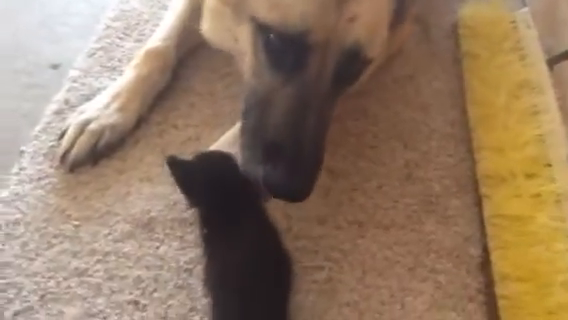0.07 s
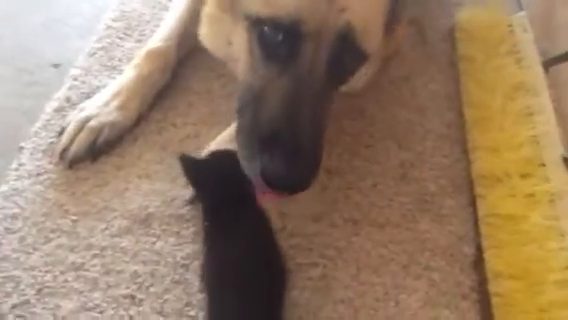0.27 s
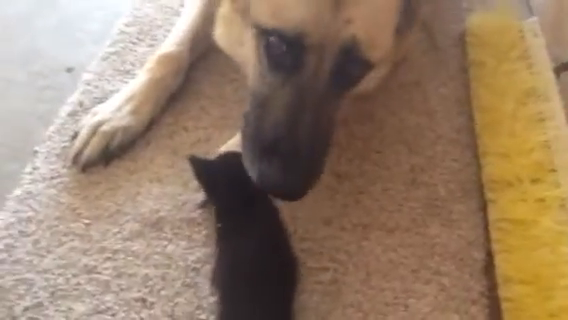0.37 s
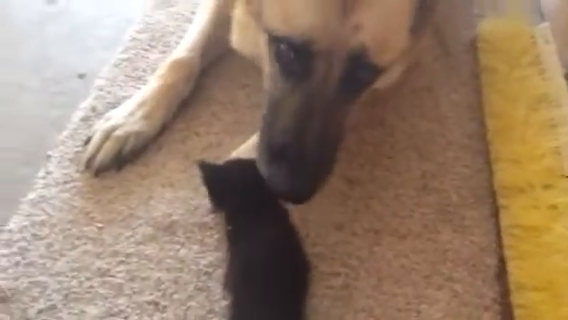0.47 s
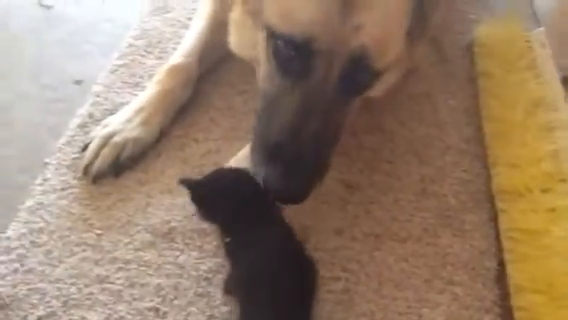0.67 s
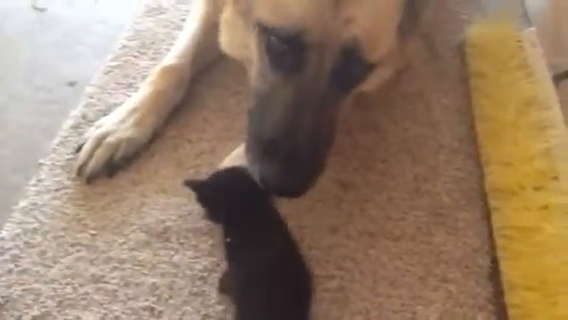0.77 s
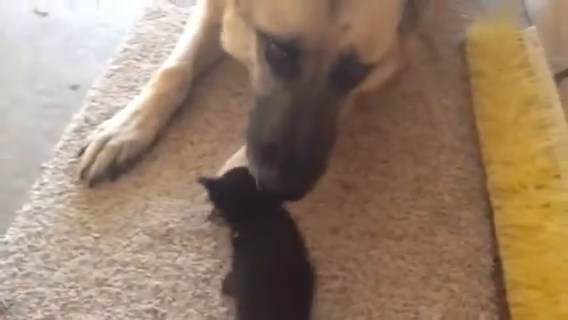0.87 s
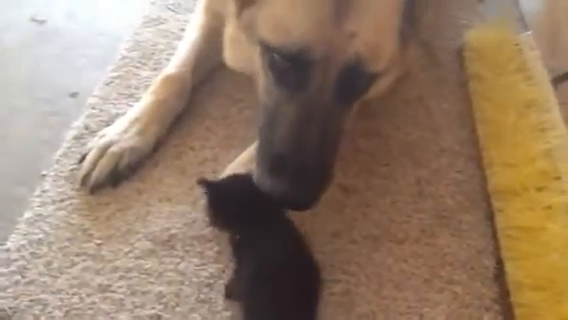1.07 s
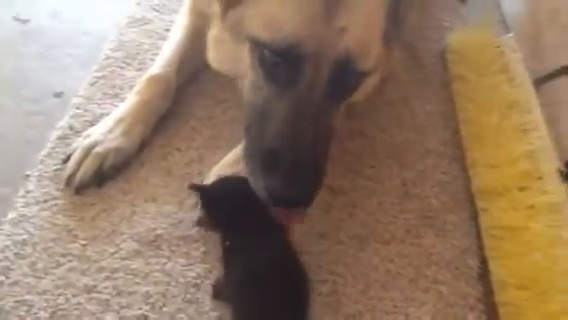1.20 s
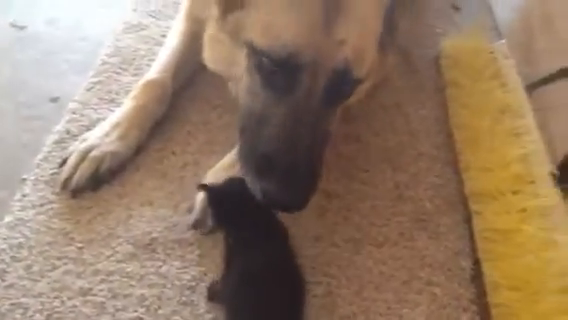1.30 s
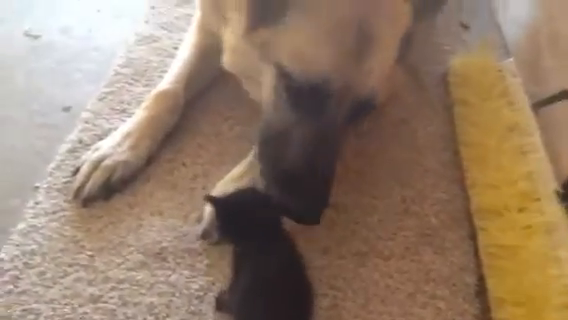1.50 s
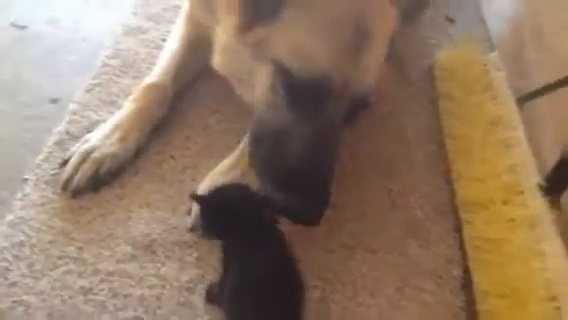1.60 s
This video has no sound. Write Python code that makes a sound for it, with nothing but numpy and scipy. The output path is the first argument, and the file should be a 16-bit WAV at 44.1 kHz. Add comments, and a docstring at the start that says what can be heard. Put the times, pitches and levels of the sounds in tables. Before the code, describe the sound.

A dog licking a kitten, with wet smacks and soft plops in a quiet room.

```python
"""Wet smacks and soft plops, close up: a dog licks a kitten on a carpet in a quiet room.
Films of saliva snap as tongue and lips part, small pockets in the mouth plop and tiny bubbles burst,
while the tongue brushes over fur in grainy strokes. The carpet leaves almost no echo.
Underneath, an appliance hums faintly over the room's hiss, with a few thin, high whistles."""
import sys
import numpy as np
from scipy import signal
from scipy.fft import rfft, irfft
from scipy.io import wavfile

SR = 44100
rng = np.random.default_rng(int(sys.argv[2]) if len(sys.argv) > 2 else 0)


def wrap_up_sound(samples):
    """Save the sound to the file named by the first command line argument, as 16-bit audio."""
    columns = np.atleast_2d(samples).T
    # keep every value between -1 and 1, then stretch to whole-number steps
    tamed = np.clip(columns, -1, 1)
    steps = np.round(tamed * 32767).astype(np.int16)
    wavfile.write(sys.argv[1], SR, steps)


N = 72765

# tone of the room's air: f/Hz, level/dB
AIR_EQ = [(25, -29), (55, -22.5), (80, -8.5), (115, -5), (150, -2), (190, -4.5), (300, -9), (450, -5.5),
          (700, -17.5), (1200, -12), (2000, -16), (4000, -21.5), (7000, -21.5), (9500, -30.5), (12500, -30),
          (15000, -28)]
# fader ride on the air's hiss: t/s, level/dB
HISS_RIDE = [(0, 4.5), (.2, 3), (.52, 4), (.58, 0.5), (.95, 2), (1.35, 0), (1.48, 2), (1.65, 0.5)]
# tone of the topmost hiss: f/Hz, level/dB
TOP_HISS_EQ = [(6000, -28), (9500, 0.5), (12000, 2.5), (15000, -8)]
# fader ride on the topmost hiss: t/s, level/dB
TOP_HISS_RIDE = [(0, -101), (.44, -83), (.51, -75), (.56, -99), (1.45, -84.5), (1.58, -74), (1.65, -72)]
# thin whistles: start t/s, length/s, base f/Hz, pitch arch/Hz, level/dB
WHISTLE_WISPS = [(.07, .14, 9900, 600, -85), (.06, .13, 11100, 900, -87), (.31, .13, 10000, 300, -88),
                 (.89, .13, 10700, 120, -90)]
# tongue strokes over fur: centre t/s, Gaussian width/s, rub level/dB, hiss level/dB
FUR_STROKES = [ (0.027, 0.023, -62, -67), (.315, 0.0069, -80, -62.5), (0.394, 0.022, -67, -96),
               (0.451, 0.013, -67, -62.5), (0.505, 0.024, -55.5, -60.5), (.718, 0.056, -56, -78),
               (0.836, 0.021, -57.5, -82), (0.927, 0.033, -57, -73.5), (1.048, 0.015, -51, -71),
               (1.122, 0.027, -62, -92), (1.248, 0.015, -63.5, -70), ]
# tone of the fur's dull rub: f/Hz, level/dB
FUR_RUB_EQ = [(100, -24.5), (250, -3.5), (450, 1), (1000, 0), (1500, -4.5), (2200, -7), (3300, -14),
              (4500, -25.5), (15000, -34)]
# tone of the fur's bright hiss: f/Hz, level/dB
FUR_HISS_EQ = [(500, -20), (2000, 5), (4500, 3.5), (7000, 5), (9500, -4.5), (12500, -14.5), (15000, -5)]
# tone of a bursting bubble: f/Hz, level/dB
BUBBLE_EQ = [(100, -38), (500, -3.5), (2000, -3.5), (3500, -1.5), (7000, -8.5), (9500, -15), (15000, -17)]
# soft plops of tongue and jaw: t/s, level/dB, pitch f/Hz, bandwidth/Hz
POCKET_PLOPS = [ (.3850, -18, 720, 300), (0.4303, 14, 265, 328), (.4330, -13, 1640, 1800),
                (0.4618, -20, 1940, 1190), (.5081, -7.5, 1110, 694), (0.509, 1.5, 373, 158),
                (0.907, -6, 337, 534), (1.0563, -0.5, 670, 310), (1.401, -2, 346, 72),
                (1.5160, -22, 600, 700), (1.5953, -12.5, 760, 293), ]
# wet snaps: t/s, level/dB, low-cut f/Hz, high-cut f/Hz, edge level/dB, edge tilt/(dB per octave)
SALIVA_SMACKS = [ (.2058, 17.5, 404, 5870, -2.5, -9), (0.2106, 4, 356, 4500, 6.5, -39),
                 (.3378, 13, 383, 2520, -22, -21), (0.5384, 20.5, 330, 3450, -42, 9),
                 (0.659, -25, 403, 2460, -29, 0), (.7890, -13.5, 383, 2840, -4.5, 7),
                 (0.8199, -13.5, 422, 2830, -3, 5), (1.0409, -8.5, 730, 2750, -7, 10),
                 (1.0464, -17, 600, 3000, -27, -10), (1.054, -13.5, 400, 2760, 0, 4),
                 (1.1618, -5, 800, 3880, -10, 17), (1.2151, -3, 877, 3400, -8, 13.5),
                 (1.2410, -22, 450, 5000, 8.5, -7), ]
# close-microphone tone shared by all smacks and plops: f/Hz, level/dB
CLICK_COLOUR_EQ = [(40, -43), (150, -6.5), (280, -3), (480, -3.5), (830, 0), (1150, -5), (1600, -2),
                   (2000, -1.5), (2800, -9.5), (3500, -8), (4200, -19), (5500, -17), (7400, -14),
                   (9600, -26), (11800, -20.5), (15500, -29)]

AIR_DB, HISS_SPLIT_HZ = -67.5, 270
HUM_HZ, HUM_DB, HUM_WAVER_DB = 235.1, -67.5, -1.56
WHISTLE_FLICKER_DB = -5
FUR_GRAIN_DB, FUR_GRAIN_PER_S = 2.5, 130
BUBBLE_COUNT, BUBBLE_DB, BUBBLE_SPREAD_DB = 30, -32.5, 4.5
PLOP_SOFT_RATIO = 2.88  # plops roll off above this multiple of their pitch
EDGE_TILT_FROM_HZ = 8400
SMEAR_HZ, SMEAR_WIDTH_HZ = 2600, 730  # this band trails the attack by a fraction of a millisecond
NEAR_DB, NEAR_T60_S = -14, 0.014
ROOM_DB, ROOM_T60_S = -41, 0.15
TAIL_PREDELAY_S, TAIL_TOP_HZ = 0.00091, 3500  # carpet and fur swallow the treble
HIGH_CUT_HZ = 15300


def undb(db):
    """Decibels to gain."""
    return 10 ** (np.asarray(db) / 20)


def freqs():
    """Frequency in Hz of each bin of a 2N-point spectrum, at least 1."""
    return np.maximum(np.arange(N + 1) * SR / (2 * N), 1)


def eq_curve(points):
    """Gain per bin through (f/Hz, level/dB) points."""
    hz, db = np.array(points, float).T
    return undb(np.interp(np.log(freqs()), np.log(hz), db))


def ride(points):
    """Gain per sample through (t/s, level/dB) points."""
    return undb(np.interp(np.arange(N) / SR, *np.array(points).T))


def minimum_phase(gain):
    """The response with the tightest attack for this gain curve."""
    cepstrum = irfft(np.log(gain + 1e-9))
    cepstrum[1:N] *= 2
    cepstrum[N + 1:] = 0
    return np.exp(rfft(cepstrum))


def delay(seconds):
    """Response of a delay."""
    return np.exp(-2j * np.pi * freqs() * seconds)


def resonance(hz, width_hz):
    """Band-pass response, gain 1 at the centre."""
    f = freqs()
    return 1 / (1 + 1j * (f * f - hz * hz) / (f * width_hz))


def low_pass(hz):
    """Two-pole low-pass response."""
    ratio = freqs() / hz
    return 1 / (1 - ratio * ratio + 1j * np.sqrt(2) * ratio)


def noise(eq):
    """Coloured noise of rms 1."""
    coloured = irfft(rfft(rng.standard_normal(2 * N)) * eq_curve(eq))[:N]
    return coloured / coloured.std()


def wobble(per_s):
    """Random modulator gliding between values of spread 1."""
    return np.interp(np.arange(N) / SR * per_s, np.arange(N), rng.standard_normal(N))


def tail(db, t60):
    """Response of the short, dull wash that soft surroundings scatter back."""
    t = np.arange(N) / SR - TAIL_PREDELAY_S
    wash = rng.standard_normal(N) * (t > 0) * np.exp(-np.log(1000) * np.abs(t) / t60)
    return undb(db) * rfft(wash / np.linalg.norm(wash), 2 * N) * low_pass(TAIL_TOP_HZ)


def room_tone():
    """A steady low bed of air under hiss that eases off and returns."""
    air = undb(AIR_DB) * noise(AIR_EQ)
    murmur = signal.sosfiltfilt(signal.butter(2, HISS_SPLIT_HZ, fs=SR, output="sos"), air)
    hiss = (air - murmur) * ride(HISS_RIDE)
    top_hiss = noise(TOP_HISS_EQ) * ride(TOP_HISS_RIDE)
    return murmur + hiss + top_hiss


def appliance_hum():
    """An appliance holds one low tone whose level wavers."""
    t = np.arange(N) / SR
    return np.sqrt(2) * np.sin(2 * np.pi * HUM_HZ * t) * undb(HUM_DB + HUM_WAVER_DB * wobble(25))


def whistles():
    """Very faint high whistles rise and fall in broken wisps."""
    t, wisps = np.arange(N) / SR, 0
    for start, length, hz, arch_hz, db in WHISTLE_WISPS:
        arch = np.sin(np.pi * np.clip((t - start) / length, 0, 1))
        pitch = hz + arch_hz * arch + 60 * wobble(500)
        envelope = undb(db + WHISTLE_FLICKER_DB * wobble(70)) * np.sqrt(2 * np.abs(arch))
        wisps += envelope * np.sin(2 * np.pi * np.cumsum(pitch) / SR)
    return wisps


def fur():
    """Each stroke of the tongue swells and fades as a grainy rub with some hiss."""
    t, strokes = np.arange(N) / SR, 0
    rub, hiss = noise(FUR_RUB_EQ), noise(FUR_HISS_EQ)
    for centre, width, rub_db, hiss_db in FUR_STROKES:
        swell = np.exp(-((t - centre) / width) ** 2 / 2)
        strokes += swell * (undb(rub_db) * rub + undb(hiss_db) * hiss)
    grain = undb(FUR_GRAIN_DB * (wobble(FUR_GRAIN_PER_S) - 1.5))
    return strokes * grain


def bubbles():
    """Tiny bubbles of saliva burst at random in a fine crackle."""
    when, strength = rng.random((BUBBLE_COUNT, 2)).T
    pulses = np.zeros(N)
    pulses[(when * (N - 1)).astype(int)] = undb(BUBBLE_DB + BUBBLE_SPREAD_DB * (2 * strength - 1))
    bursts = rfft(pulses, 2 * N) * minimum_phase(eq_curve(BUBBLE_EQ))
    return irfft(bursts * (0.5 + tail(NEAR_DB, NEAR_T60_S)))[:N]


def plop(start, db, hz, width_hz):
    """Spectrum of a pocket in the mouth opening softly and ringing briefly."""
    return undb(db) * resonance(hz, width_hz) * low_pass(PLOP_SOFT_RATIO * hz) ** 2 * delay(start)


def smack(start, db, low_hz, high_hz, edge_db, tilt_db):
    """Spectrum of a saliva film snapping: one pulse, rounded by its size, with a thin bright edge."""
    f = freqs()
    body = 1 / (1 + (f / high_hz) ** 8)
    low_cut = 1 / (1 + (low_hz / f) ** 4)
    edge = undb(edge_db + tilt_db * np.log2(np.maximum(f / EDGE_TILT_FROM_HZ, 1)))
    power = low_cut * (body + (1 - body) * edge ** 2)
    return undb(db) * minimum_phase(np.sqrt(power)) * delay(start)


def mouth():
    """Smacks and plops take a shared close-microphone tone and a very short tail."""
    hits = [smack(*row) for row in SALIVA_SMACKS] + [plop(*row) for row in POCKET_PLOPS]
    near = sum(hit * (1 + tail(NEAR_DB, NEAR_T60_S)) for hit in hits)
    smear = 2 * resonance(SMEAR_HZ, SMEAR_WIDTH_HZ) - 1  # all-pass
    coloured = near * minimum_phase(eq_curve(CLICK_COLOUR_EQ)) * smear
    return -irfft(coloured * (1 + tail(ROOM_DB, ROOM_T60_S)))[:N]


def scene():
    """Mono mix: the licking up front, the room far beneath."""
    return (mouth() + bubbles() + fur() + whistles() + room_tone() + appliance_hum())[None]


def record(dry):
    """A steep high cut on the whole mix."""
    return signal.sosfiltfilt(signal.butter(20, HIGH_CUT_HZ, fs=SR, output="sos"), dry)


dry = scene()
out = record(dry)
wrap_up_sound(out)
```